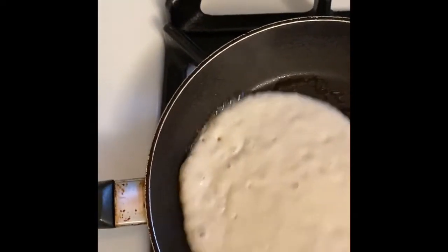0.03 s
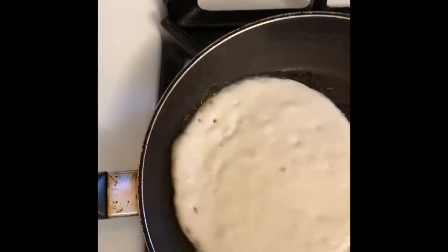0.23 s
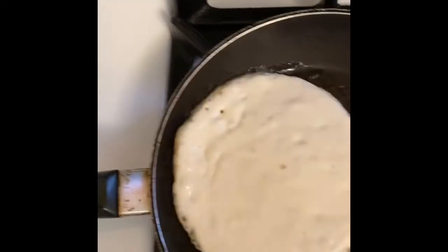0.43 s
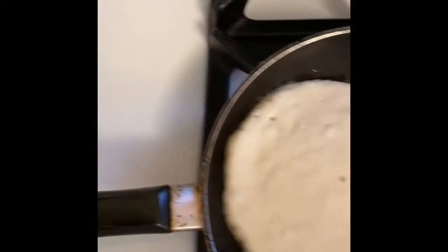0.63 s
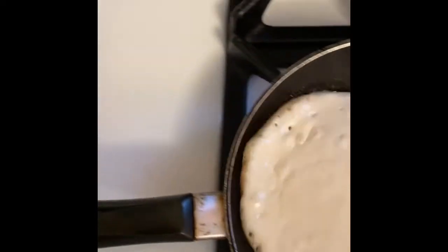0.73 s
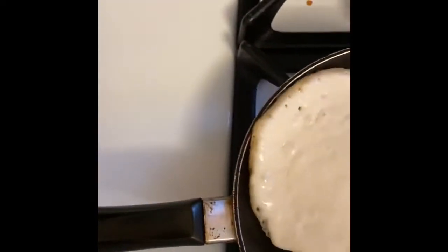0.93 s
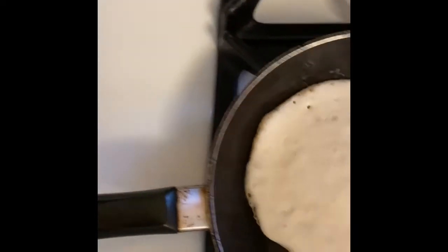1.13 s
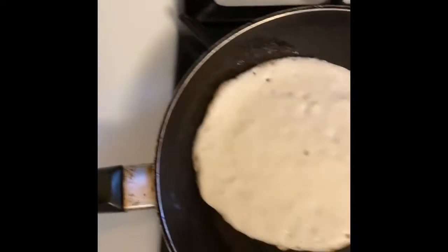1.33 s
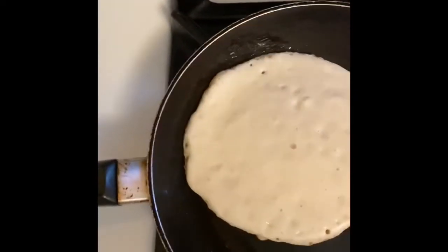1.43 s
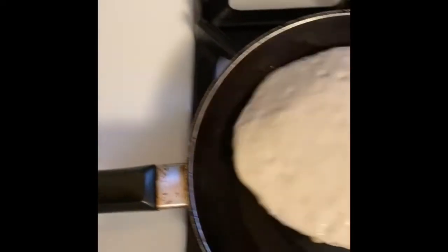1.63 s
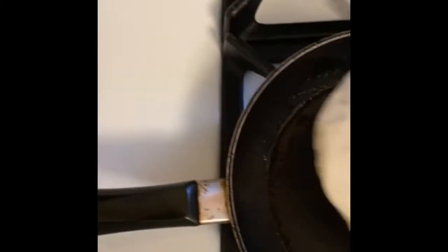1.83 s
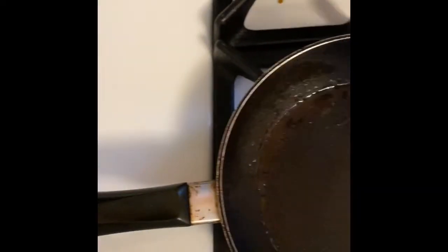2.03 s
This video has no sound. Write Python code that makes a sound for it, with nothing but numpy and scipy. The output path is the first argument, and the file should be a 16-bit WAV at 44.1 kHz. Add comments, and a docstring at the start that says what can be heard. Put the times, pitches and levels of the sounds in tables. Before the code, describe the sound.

A frying pan knocks and scrapes on a stove grate as a pancake sizzles, with two loud clanks

```python
"""A pan with a pancake is shaken on a stove grate and a spatula slides under the cake, close to a phone.
From the start the pan knocks (decaying modes and contact noise), scrapes and drags (friction noise)
over a low hum and the air of the kitchen; fat sizzles (noise and ticks) and pops (snaps), thickest near 1.1 s.
Two loud knocks follow at 1.2 and 1.35 s, the second leaving a thin lingering tone.
From about 1.55 s the sizzle calms as the cake is lifted."""
import sys
import numpy as np
from scipy import signal
from scipy.fft import rfft, irfft
from scipy.io import wavfile
from scipy.ndimage import uniform_filter1d

SR = 44100
rng = np.random.default_rng(int(sys.argv[2]) if len(sys.argv) > 2 else 0)


def dump_mix(stems):
    """Bounce the given channels to the path in sys.argv[1] as a 16-bit WAV at rate SR."""
    frames = np.atleast_2d(stems).T  # one column per channel
    limited = np.clip(frames, -1, 1)  # hard clip at full scale
    pcm = np.round(limited * 32767).astype(np.int16)
    wavfile.write(sys.argv[1], SR, pcm)


def magnitude_from_level(level_db):
    """Linear magnitude for a level in decibels (20 dB per decade)."""
    exponent = np.asarray(level_db, float) / 20
    return 10 ** exponent


N = 91198  # samples


def evened(x):
    """Scales to rms 1."""
    return x / np.sqrt(np.mean(x ** 2) + 1e-20)


def read(points, hz):
    """Reads a table on a log-frequency axis."""
    table_hz, value = np.transpose(points)
    return np.interp(np.log(hz + 1), np.log(table_hz + 1), value)


def level(curve):
    """Gain over time from (start_s, level_db) rows."""
    return magnitude_from_level(np.interp(np.arange(N) / SR, *np.transpose(curve)))


def colour(x, spectrum):
    """Filters by a (pitch_hz, level_db) table."""
    hz = np.fft.rfftfreq(len(x), 1 / SR)
    return irfft(rfft(x) * magnitude_from_level(read(spectrum, hz)), len(x))


def resonate(x, hz, width_hz):
    """One damped resonance of about unit gain at its centre; a narrower width rings longer."""
    r = np.exp(-np.pi * width_hz / SR)
    pole = r * np.exp(2j * np.pi * hz / SR)
    return 2 * signal.lfilter([1 - r], [1, -pole], x).real


def add(mix, s, sound):
    """Mixes a sound in at s seconds."""
    part = mix[round(s * SR):][:len(sound)]
    part += sound[:len(part)]


# Knocks of the pan on the grate: start_s, strength_db (before the knock trim), low_db, mid_db, high_db,
# top_db (offsets of the four mode groups), ring_share (of the free ring time, modes above the low group)
KNOCK_HITS = [(0.013, -30, -2, -5, 4, -25, 0.49), (0.093, -32, 5.5, -12, -13, -22, .7),
              (0.138, -23, 5.5, 9.5, 6, -37, 0.94), (0.186, -40, -12, -23, -23, -10, .6),
              (0.288, -26, 3.5, 5, -4.5, -16, 0.8), (0.357, -38.5, -35, 5, -1, -3, 0.49),
              (0.444, -37.5, -14, 3, 1, -6, 0.34), (0.512, -30.5, 2.5, -13, -3, -12, 0.98),
              (0.622, -33.5, -1, 4, 8, 8.5, 0.3), (0.776, -38.5, 0, 4, 2, -3, .5),
              (0.897, -42, -6, 15.5, 20, 15, 0.25), (0.922, -37, 4.5, -4.5, -4.5, 7, 1.2),
              (1.133, -28, 3.5, -1, -6.5, -24, 0.94), (1.189, -25.5, 2, -9, 5.5, -13, 0.69),
              (1.206, -17, 3, 6.5, 14, 12.5, 0.92), (1.323, -30, 4.5, -14, 1.5, -12, 1.05),
              (1.347, -18, 4, 0, 11, 9.5, 0.89), (1.362, -24.5, 10, 12, 14, 5.5, 0.67),
              (1.438, -40, 4, -19, -6, -13, 0.36), (1.637, -30, 3.5, -5, -12, -20, 0.6),
              (1.856, -42.5, 10, -25, -25, -23, 1.03)]
# Modes of pan and grate, relative levels: pitch_hz, level_db, t60_s
PAN_MODES = [(230.6, -7.5, 0.28), (262.8, -5.5, 0.29), (300, -8.5, 0.12), (350, -10, 0.1),
             (393.6, -5.5, 0.2), (480, -14, 0.083), (556.4, -16, 0.16), (602, -12.5, 0.17),
             (722, -21.5, 0.16), (823, -14, 0.11), (970, -26, 0.097), (1083, 1, 0.043), (1103.7, 0.5, .12),
             (1200, 2, 0.012), (1400, -21, 0.21), (1668, 2, 0.026), (1855, -16, 0.1), (1972, 3, 0.03),
             (2078, -4, 0.059), (2123, -21, 0.038), (3112, -29, 0.17), (3233, -23, 0.09), (3360, -25, 0.14),
             (3560, -14, 0.034), (4080, -18.5, 0.045), (4970, -23, 0.039), (5488, -4.5, 0.036)]
# Relative spectrum of the contact crack: pitch_hz, level_db
CRACK_SPECTRUM = [(200, -32), (1000, 18), (2000, -5.5), (3000, 0), (5500, -1.5), (7000, 7), (12000, -6),
                  (15800, -15), (16500, -63)]
# Relative spectrum of the dull stove-top body: pitch_hz, level_db
THUD_SPECTRUM = [(35, -35), (90, -2), (160, -4.5), (300, 2), (570, -2), (800, 3), (1000, -4), (1400, -25)]
LOW_HZ, MID_HZ, HIGH_HZ, TOP_HZ = 601.6, 1300, 1800, 3900  # end of the low modes; starts of the others


def knocks():
    """Each knock rings fluttering modes, rebounds three times, and adds a crack, a rattle and a thud."""
    knock_trim_db, low_rise_s, high_rise_s = -5, 0.0044, 0.0019
    flutter_depth, flutter_hz, flutter_onset_s = 0.33, 60, 0.0051
    crack_db, crack_t60_s = -12, 0.012
    rattle_db, rattle_t60_s = -23, 0.21
    thud_db, thud_t60_s = -15, 0.25
    out, t = np.zeros(N), np.arange(SR // 2) / SR
    hz, mode_db, t60 = (column[:, None] for column in np.transpose(PAN_MODES))
    low = hz < LOW_HZ
    # low modes swell in; the others snap
    swell = 1 - np.exp(-t / low_rise_s)
    attack = np.where(low, swell, np.minimum(t / high_rise_s, 1))
    flutter_gain = flutter_depth * np.where(low, 0.4, 1) * np.minimum(t / flutter_onset_s, 1)
    burst = magnitude_from_level(crack_db - 60 * t / crack_t60_s) + magnitude_from_level(rattle_db - 60 * t / rattle_t60_s)
    for s, strength_db, low_db, mid_db, high_db, top_db, ring_share in KNOCK_HITS:
        landing, turn = np.split(rng.random((len(PAN_MODES), 2)), 2, axis=1)
        crack_noise, thud_noise = rng.standard_normal((2, len(t)))
        rebounds = rng.random(3)
        # loose contact makes each mode flutter: random steps, two per flutter period
        steps = rng.standard_normal((len(PAN_MODES), flutter_hz + 2))
        flutter = np.array([np.interp(t * 2 * flutter_hz, np.arange(len(row)), row) for row in steps])
        group_db = np.select([low, hz > TOP_HZ, hz > HIGH_HZ, hz > MID_HZ],
                             [low_db, top_db, high_db, mid_db], 0)
        # each knock lands elsewhere: every mode loses 2 to 6 dB
        landing_db = 4 * (landing - 1.5)
        held_s = t60 * np.where(low, 1, ring_share)
        gain = magnitude_from_level(mode_db + group_db + landing_db - 60 * t / held_s)
        phase = turn * np.where(low, 1, 0.3)  # turns
        modes = gain * attack * (1 + flutter_gain * flutter) * np.sin(2 * np.pi * (hz * t + phase))
        ring = modes.sum(0)
        # the contact noise follows the balance of the mode groups
        crack = colour(evened(colour(crack_noise, CRACK_SPECTRUM)),
                       [(MID_HZ, mid_db), (HIGH_HZ, high_db), (TOP_HZ, high_db), (4600, top_db)])
        body = evened(colour(thud_noise, THUD_SPECTRUM))
        thud = magnitude_from_level(thud_db + low_db - 60 * t / thud_t60_s) * swell * body
        strength = magnitude_from_level(strength_db + knock_trim_db)
        add(out, s, strength * (ring + burst * crack + thud))
        # rebounds 4 to 24 ms after the knock, the later the weaker
        for share in rebounds:
            add(out, s + 0.0039 + share * 0.02, strength * magnitude_from_level(-11 * (1.5 + share)) * ring)
    return out


# Slides of the pan bottom over the iron: start_s, length_s, level_db, first_hz, last_hz
SLIDES = [(0.013, 0.055, -41, 1507, 2163), (0.167, 0.059, -48.5, 1690, 1952),
          (0.387, 0.085, -55, 1600, 1880), (0.455, 0.08, -43.5, 1593, 2240),
          (0.547, 0.057, -51, 1927, 1805), (0.627, 0.0693, -47, 1900, 1697),
          (0.775, 0.068, -55.5, 1500, 1508), (0.901, 0.12, -56.5, 1400, 1475)]
# Relative spectrum of the thin brush: pitch_hz, level_db
BRUSH_SPECTRUM = [(500, -19), (1200, 2.5), (2500, -12), (5000, -8.5), (7000, -14), (10000, -14)]


def scrapes():
    """Each slide is a swell of gritty friction noise whose broad resonance glides, over a thin brush."""
    width_hz, grit_db, brush_db = 900, 3.5, -1.5
    out = np.zeros(N)
    for s, length_s, level_db, first_hz, last_hz in SLIDES:
        noise = rng.standard_normal((2, 8000))[:, :round(length_s * SR)]
        grit = magnitude_from_level(grit_db * evened(uniform_filter1d(noise[1, ::-1], size=90)))
        friction, bristle = noise * grit
        u = np.linspace(0, 1, len(friction))
        # low-passed noise, shifted up by a gliding carrier
        carrier = np.cos(2 * np.pi * np.cumsum(first_hz + (last_hz - first_hz) * u) / SR)
        band = resonate(resonate(friction, 0, width_hz), 0, width_hz) * carrier
        brush = magnitude_from_level(brush_db) * evened(colour(bristle, BRUSH_SPECTRUM))
        add(out, s, magnitude_from_level(level_db) * np.sin(np.pi * u) * (evened(band) + brush))
    return out


# Level of the pan dragging over the grate: start_s, level_db
DRAG_CURVE = [(0.0, -51), (0.24, -53), (0.54, -55), (0.78, -55.5), (0.91, -54.5), (1.17, -84), (1.3, -46),
              (1.65, -65), (2.07, -62.5)]


def drag():
    """Gritty friction keeps the damped modes of the pan sounding."""
    longest_ring_s, grit_db, low_boost_db = 0.034, 2.5, 13
    friction = rng.standard_normal(N)
    unevenness = evened(uniform_filter1d(rng.standard_normal(N), size=150))
    grit = friction * magnitude_from_level(grit_db * unevenness)
    body = np.zeros(N)
    for hz, mode_db, t60 in PAN_MODES:
        mode = evened(resonate(grit, hz, 3.0 / min(t60, longest_ring_s)))
        body += magnitude_from_level(mode_db + low_boost_db * (hz < LOW_HZ)) * mode
    return level(DRAG_CURVE) * evened(body)


# The tone after the second loud knock: start_s, pitch_hz, level_db (before rise and decay), rise_s, t60_s
LATE_TONE = (1.365, 3560, -39, .012, .26)


def thin_tone():
    """One high mode of the pan swells late and dies slowly."""
    s, hz, level_db, rise_s, t60 = LATE_TONE
    t = np.maximum(np.arange(N) / SR - s, 0)
    return magnitude_from_level(level_db - 60 * t / t60) * (1 - np.exp(-t / rise_s)) * np.sin(2 * np.pi * hz * t)


# Pops of fat: start_s, peak_db (of the snap, before the low cut), centre_hz,
# ping_db (5 ms later, relative to that peak)
FAT_POPS = [(0.132, -31, 9000, -35), (0.2589, -33, 9100, -30), (0.3366, -21, 8800, -42),
            (0.4127, -22, 9200, -42), (0.4507, -29, 10600, -31), (0.4898, -31, 10900, -30),
            (0.5507, -16, 14400, -49), (0.6125, -29, 11800, -38), (0.6813, -24, 12600, -41),
            (0.8289, -29, 9200, -36), (0.8973, -24, 9700, -36), (0.9265, -31, 11500, -38),
            (0.9862, -25, 11500, -38), (1.0021, -32, 11300, -35), (1.0111, -30, 10600, -36),
            (1.0302, -29, 9800, -36), (1.0467, -20, 9200, -32), (1.0684, -29, 10300, -34),
            (1.0774, -12, 13000, -45), (1.0963, -27, 10700, -39), (1.1099, -23, 8400, -32),
            (1.1149, -19, 11000, -24), (1.1188, -22, 8900, -21), (1.1227, -24, 10000, -25),
            (1.3023, -22, 9000, -34), (1.4302, -18, 7700, -42), (1.444, -26, 8100, -32),
            (1.4496, -25, 9500, -34), (1.4555, -21, 11000, -45), (1.5027, -30, 11800, -42),
            (1.5265, -25, 12700, -45), (1.5501, -32, 12000, -37), (1.6421, -36, 10800, -39),
            (1.6898, -35, 11500, -40), (1.7852, -40, 10000, -41)]


def pops():
    """A bursting bubble: a snap with spray, a hiss after it, a faint ping of the pan's top mode."""
    snap_s, spray_s = 0.00008, 0.0004  # time constants
    hiss_db, hiss_t60_s = -38, 0.21
    ping_hz, _, ping_t60 = PAN_MODES[-1]
    out, t = np.zeros(N), np.arange(-44, 2500) / SR
    for s, peak_db, hz, ping_db in FAT_POPS:
        noise = evened(resonate(rng.standard_normal(len(t)), hz, min(hz * 0.34, 9000)))
        spray = 0.5 * noise * np.exp(-abs(t) / spray_s)
        snap = np.sin(2 * np.pi * hz * t) * np.exp(-abs(t) / snap_s) + spray
        snap /= abs(signal.hilbert(snap)).max()
        hiss = noise * magnitude_from_level(hiss_db - 60 * t / hiss_t60_s)
        ping = magnitude_from_level(ping_db - 60 * (t - 0.005) / ping_t60) * np.sin(2 * np.pi * ping_hz * t)
        add(out, s + t[0], magnitude_from_level(peak_db) * (snap + (hiss + ping) * (t > 0)))
    return colour(out, [(2000, -30), (4500, 0)])  # low cut


# Swell and calm of the sizzle, before the trim: start_s, level_db
SIZZLE_CURVE = [(0.0, -53), (0.52, -51.5), (0.72, -55.5), (0.91, -55), (1.08, -51.5), (1.31, -54),
                (1.39, -52), (1.55, -58), (1.78, -66), (2.07, -66)]
# Relative spectrum of the sizzle: pitch_hz, level_db
FIZZ_SPECTRUM = [(1500, -7.5), (3000, -14), (5000, -8), (7000, -3), (9000, -3), (11000, -4.5),
                 (13000, -2.5), (15600, -2.5), (16100, -49)]


def sizzle():
    """Countless tiny bubbles: hiss plus sparse ticks of uneven size."""
    ticks_per_s, tick_spread_db, tick_share, trim_db = 600, 5, 0.45, 4
    ticks = rng.random(N) < ticks_per_s / SR
    size = magnitude_from_level(tick_spread_db * np.minimum(rng.exponential(1, N), 5))
    # each tick is a short decaying burst of noise
    decay = np.exp(-np.arange(80) / 14.0)
    bursts = signal.oaconvolve(ticks * size, decay)[:N] * rng.standard_normal(N)
    mix = tick_share * evened(bursts) + np.sqrt(1 - tick_share ** 2) * rng.standard_normal(N)
    return magnitude_from_level(trim_db) * level(SIZZLE_CURVE) * evened(colour(mix, FIZZ_SPECTRUM))


# Rumble through the stove top as the pan moves, before the low cut: start_s, level_db
RUMBLE_CURVE = [(0.0, -60), (0.03, -49.5), (0.09, -48), (0.11, -41), (0.23, -46), (0.25, -40), (0.37, -53),
                (0.4, -40), (0.44, -55), (0.54, -43), (0.61, -68), (0.63, -43.5), (0.66, -60), (1.12, -60),
                (1.16, -44), (1.18, -60), (1.21, -29.5), (1.31, -57), (1.36, -35.5), (1.42, -62),
                (1.445, -31), (1.497, -35), (1.525, -52), (2.07, -67.5)]


def rumble():
    """Low lumpy noise in one broad resonance, passed twice."""
    hz, width_hz = 112, 60
    x = resonate(resonate(rng.standard_normal(N), hz, width_hz), hz, width_hz)
    return colour(level(RUMBLE_CURVE) * evened(x), [(45, -41), (80, 0)])


# Relative spectrum of the room noise: pitch_hz, level_db per Hz
AIR_SPECTRUM = [(15, -14), (25, -12), (71, 7), (172, -5), (262, -19.5), (316, -40), (389, -8), (1980, -33),
                (2280, -36.5), (5650, -38.5), (6500, -52), (8450, -95), (14300, -120)]


def kitchen_air():
    """Steady room noise and a throbbing appliance hum, its pitch blurred by narrow noise."""
    air_db, hum_db, hum_hz, fuzz_width_hz, fuzz_share = -52, -51, 59.4, 4.7, 0.21
    throb_hz, throb_depth = 2.786, 0.18
    t = np.arange(N) / SR
    throb = 1 + throb_depth * np.sin(2 * np.pi * (throb_hz * t + 0.5))
    tone = np.sin(2 * np.pi * hum_hz * t) * throb
    fuzz = resonate(resonate(rng.standard_normal(N), hum_hz, fuzz_width_hz), hum_hz, fuzz_width_hz)
    hum = evened(tone) + fuzz_share * evened(fuzz)
    air = evened(colour(rng.standard_normal(N), AIR_SPECTRUM))
    return magnitude_from_level(air_db) * air + magnitude_from_level(hum_db) * hum


def echoes(x, bands, gap):
    """Two unlike tails of random taps after gap samples, each band dying at its own speed."""
    taps = rng.standard_normal((2, SR // 2)) * (np.arange(SR // 2) > gap)
    hz, t, z = signal.stft(taps, SR, nperseg=256)
    decay = magnitude_from_level(-60 * t / read(bands, hz)[:, None])
    tail = signal.istft(z * decay, SR, nperseg=256)[1]
    return signal.fftconvolve(x[None], tail / np.linalg.norm(tail[0]), axes=1)[:, :N]


# Phase by which the left port leads: pitch_hz, lead_rad
PORT_LEAD = [(20, 0), (1000, .4), (3000, .25), (5200, .5), (6900, 2.9), (8000, 3.4), (9900, 6.0),
             (11400, 6.5), (12900, 9.2), (14300, 9.7), (16000, 12.2)]
# Level of the left port over the right: pitch_hz, level_db
PORT_TILT = [(60, 0), (125, -1.5), (250, -4.5), (500, -3.5), (1100, -4.5), (2000, -3.5), (4000, 0),
             (16000, 0)]
# Feed to the part that is unlike at both ports: pitch_hz, level_db
PORT_APART = [(50, -30), (250, -15), (550, -6.5), (900, -9), (1500, -13), (2500, -11), (4000, -13),
              (6000, -14), (14000, -11)]


def ports(x):
    """Two microphone ports hear one sound with a phase lead and a tilt, plus a diffuse unlike part."""
    hz = np.fft.rfftfreq(N, 1 / SR)
    # each port takes half of the lead and tilt, in opposite senses
    half = magnitude_from_level(read(PORT_TILT, hz) / 2) * np.exp(0.5j * np.interp(hz, *np.transpose(PORT_LEAD)))
    pair = irfft(rfft(x) * np.array([half, 1 / half]), N)
    # bands: pitch_hz, t60_s
    return pair + echoes(colour(x, PORT_APART), [(100, 0.077), (10000, 0.027)], gap=17)


# Decay of the kitchen: pitch_hz, t60_s
KITCHEN_DECAY = [(200, 0.67), (1000, 0.29), (4000, 0.053), (12000, 0.42), (16000, 0.022)]


def scene():
    """All sources through the ports; the pan also rings the kitchen; pops scatter off the pan's wall."""
    kitchen_db, scatter_db = -12, -9
    fat = pops()
    pan = knocks() + drag() + scrapes() + thin_tone() + fat
    sources = pan + rumble() + sizzle() + kitchen_air()
    kitchen = magnitude_from_level(kitchen_db) * echoes(pan, KITCHEN_DECAY, gap=85)[0]
    # scattered pops arrive 2 samples late on the left and 3 on the right
    scatter = magnitude_from_level(scatter_db) * np.array([np.roll(fat, 2), np.roll(fat, 3)])
    return scatter + ports(sources + kitchen)


# Top edge of the microphone: pitch_hz, level_db
MIC_EDGE = [(15900, 0), (16300, -22), (17200, -30), (17600, -80)]


def low_pass(x):
    """Removes everything above the highest recorded frequency."""
    return signal.sosfilt(signal.butter(12, 17160, fs=SR, output="sos"), x)


def record(dry):
    """The phone takes in both ports through the microphone's top edge."""
    mix = np.array([colour(x, MIC_EDGE) for x in dry])
    return low_pass(mix)


dry = scene()
out = record(dry)
dump_mix(out)
```